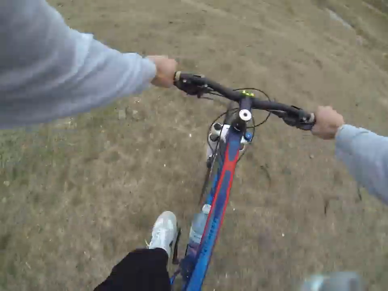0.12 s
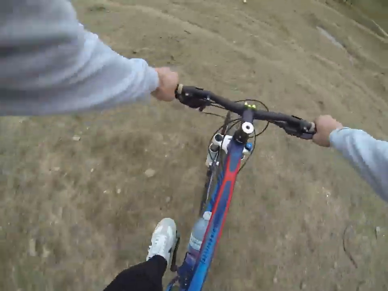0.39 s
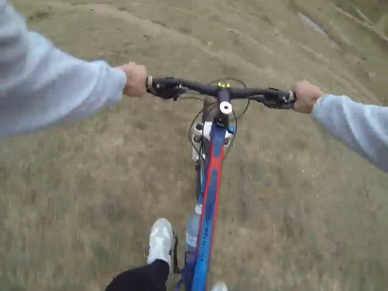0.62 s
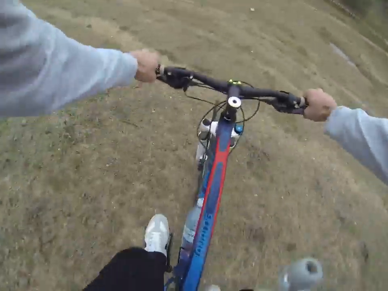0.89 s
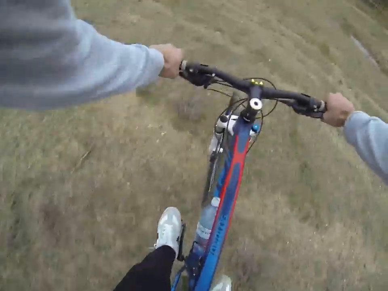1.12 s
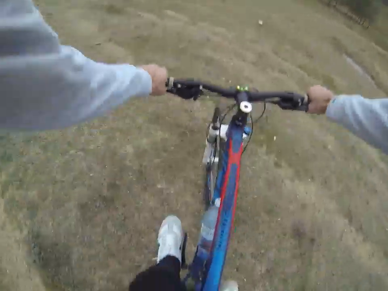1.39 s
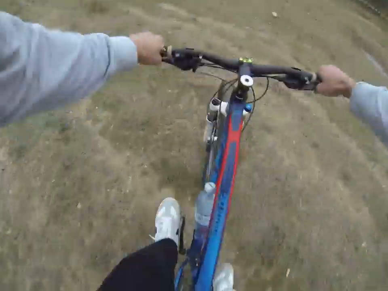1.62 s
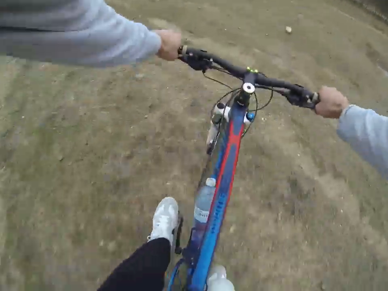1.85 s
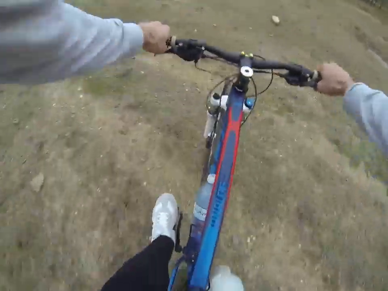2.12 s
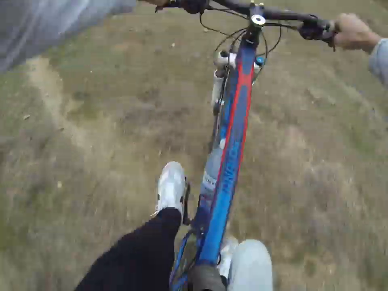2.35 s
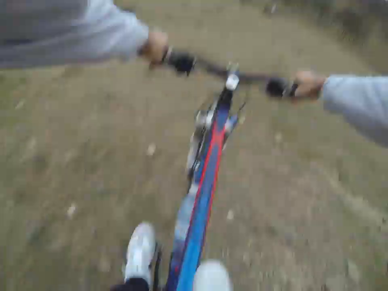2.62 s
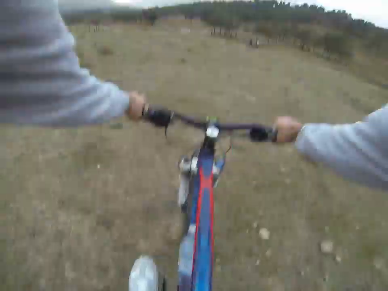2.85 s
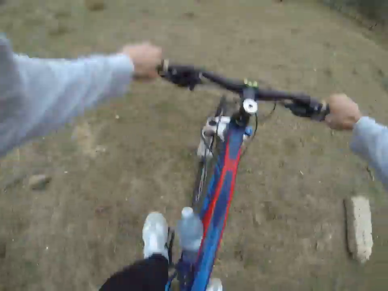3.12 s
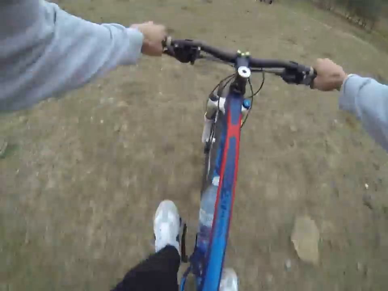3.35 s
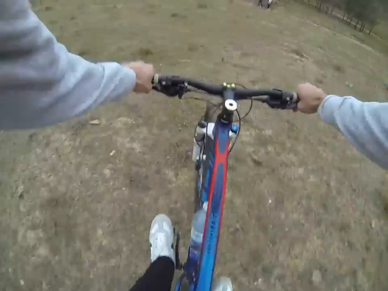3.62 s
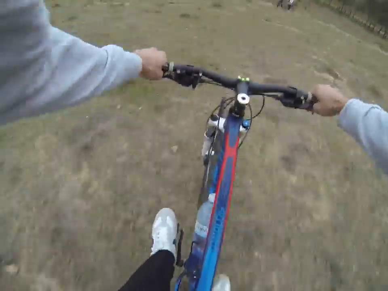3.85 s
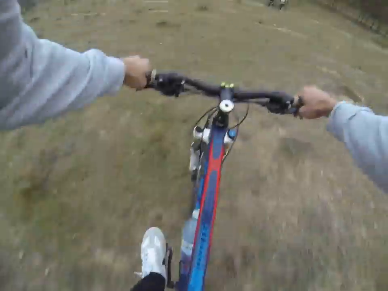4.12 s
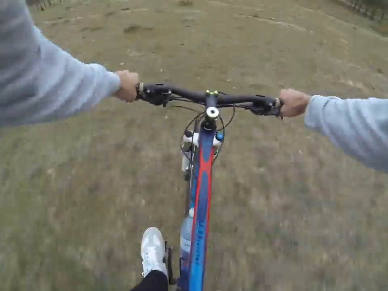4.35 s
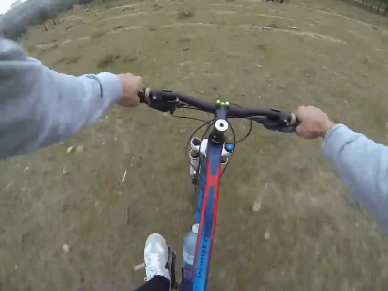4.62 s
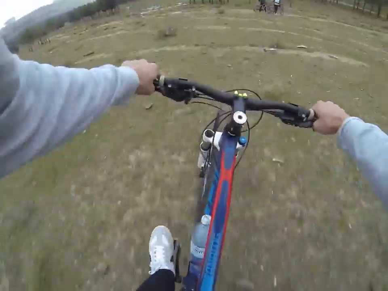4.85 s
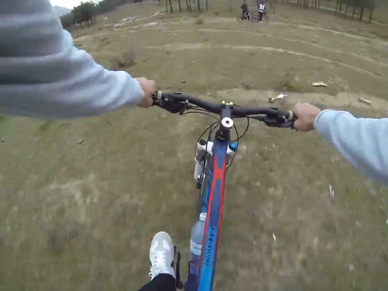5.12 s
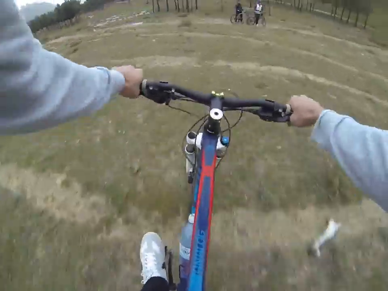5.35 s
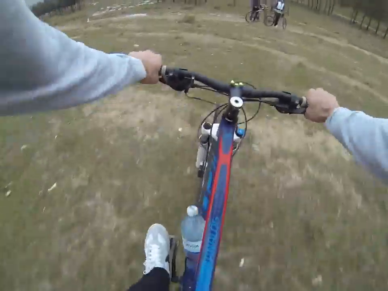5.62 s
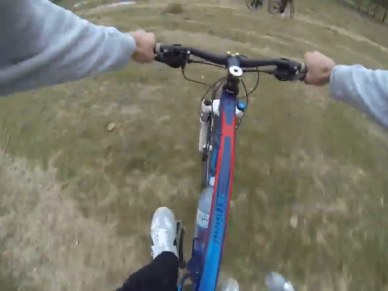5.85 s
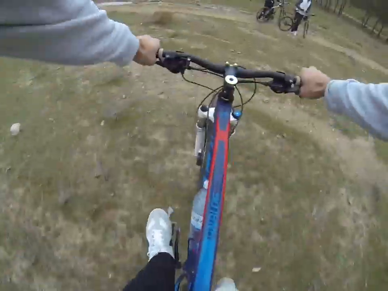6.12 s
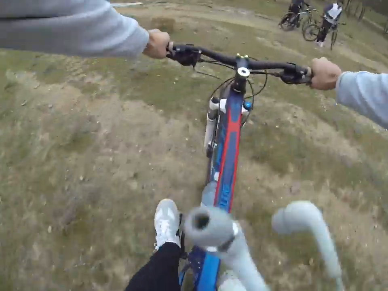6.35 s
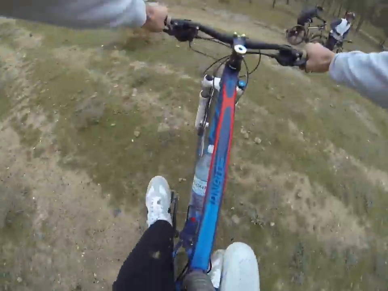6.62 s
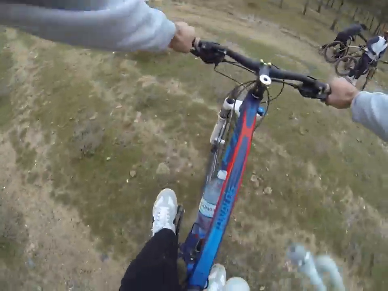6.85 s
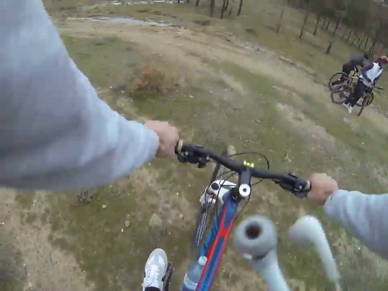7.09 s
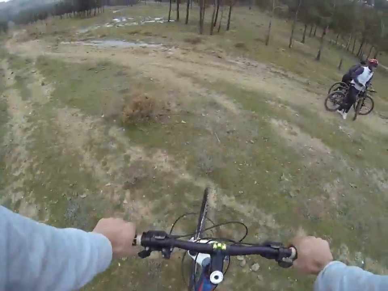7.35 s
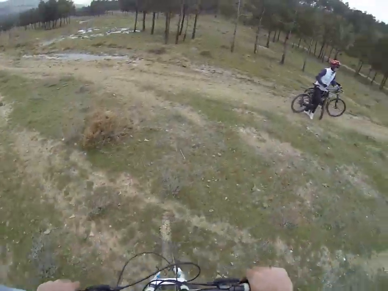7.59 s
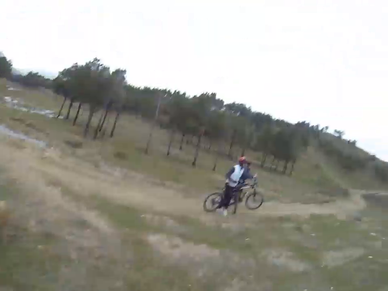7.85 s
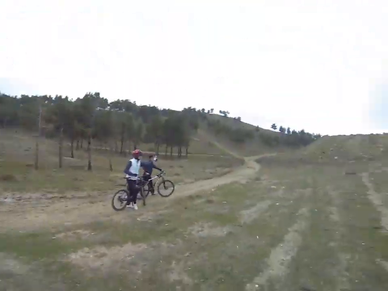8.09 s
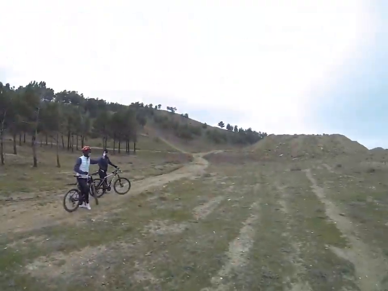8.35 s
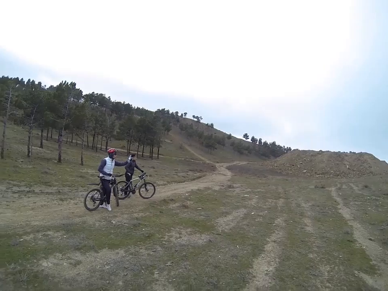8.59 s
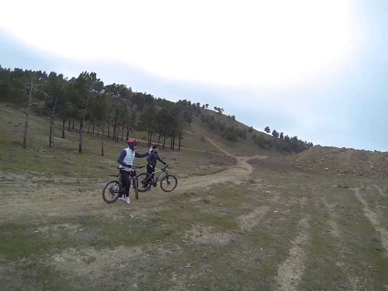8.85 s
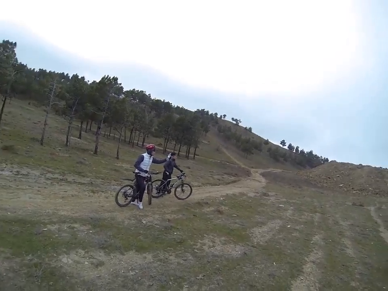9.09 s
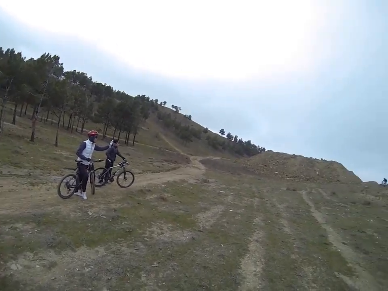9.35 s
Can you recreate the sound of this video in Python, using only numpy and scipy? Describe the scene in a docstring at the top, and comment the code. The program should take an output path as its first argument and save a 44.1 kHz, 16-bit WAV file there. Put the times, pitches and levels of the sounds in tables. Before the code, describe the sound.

Camera in a plastic case knocks and rattles on a helmet down a bumpy grass slope, with wind rumbling and small metal bike parts pinging.

```python
"""A camera in a hard plastic case rides on a cyclist's helmet down a bumpy grass slope.
From the start wind heaves the microphone and rumbles and hisses through the case, as filtered noise;
the electronics add a pulsed whine, a tone and its octave over faint hiss, that grows.
Soon the case scuffs in its mount, as grainy noise, and each jolt knocks the camera in its case,
as damped modes with noise bursts; then small metal parts of the bike ping, as bright damped modes."""
import sys
import numpy as np
from scipy import signal
from scipy.fft import rfft, irfft, next_fast_len
from scipy.io import wavfile
from scipy.ndimage import uniform_filter1d, map_coordinates

SR = 44100
rng = np.random.default_rng(int(sys.argv[2]) if len(sys.argv) > 2 else 0)


def voltage_ratio(level):
    """Linear amplitude factor for a level in decibels (scalar or array-like)."""
    return 10 ** (np.asarray(level, float) / 20)


def persist_wave(psi):
    """Save psi, clipped to +-1, as 16-bit WAV."""
    counts = np.round(np.clip(psi, -1, 1) * 32767).astype(np.int16)
    wavfile.write(sys.argv[1], SR, np.atleast_2d(counts).T)


N = 417627  # length in samples

# Jolts of the camera in its case. Each row: start in seconds, strength in dB,
# thud in dB and hardness in dB, both relative to the strength.
KNOCKS = [(0.206, -8, -32, -53), (0.282, -22, 2, -12.5), (0.331, -20.5, -18, -20), (0.379, -9.5, -6.5, -37),
          (0.42, -14.5, 2, -18), (0.456, 0.5, -14.5, -23), (0.53, -14, 11.5, -16), (0.578, -15, -15, -33),
          (0.591, 0, -2, -20), (0.676, -14.5, -3, -25.5), (0.837, -4.5, -11, -24),
          (1.014, -3.5, -16.5, -26), (1.119, 0, -18, -22), (1.149, -4.5, -1, -14.5),
          (1.246, -8.5, -8.5, -33), (1.39, -23.5, -18, -26), (1.45, -5, -7, -30), (1.467, -9.5, 6, -9),
          (1.543, -17, 11.5, -12.5), (1.555, -1.5, -11, -21), (1.637, -10.5, -10, -41.5),
          (1.693, -12.5, -6.5, -40), (1.799, -7, -21, -19.5), (1.86, -12, -4, -14.5), (1.929, -2, -25, -24),
          (1.957, -11, -23, -23), (2.065, -33, -21, 4.5), (2.081, 2.5, -19, -17.5), (2.163, -8, -32, -20.5),
          (2.177, -0.5, -15.5, -15), (2.196, -6, 1, -13.5), (2.269, -4, -23, -31), (2.321, -20, 7, -16),
          (2.454, -14.5, 0, -40), (2.509, -15, -11, -21), (2.524, -11.5, 9.5, -10), (2.554, -13, -13, -14),
          (2.625, 2, -21, -1.5), (2.728, -9.5, 3, -10.5), (2.786, -5.5, -1.5, -17),
          (2.824, -6.5, -3.5, -13), (2.877, -9, 1, -21), (2.905, -10.5, 1, -34), (2.965, -10, 4, -21.5),
          (2.988, -0.5, -2.5, -15), (3.068, -2, 3, -34.5), (3.377, -5.5, -4, -19), (3.485, -12, -4, -28),
          (3.494, -11.5, -4.5, -35), (3.729, -16, 12, -36), (3.806, -16, -5, -37), (3.885, -4, -3, -16),
          (4.603, -33, 8.5, -13), (5.146, -14.5, 11.5, -23), (5.322, -11, 19, -13.5), (5.379, -25, -11, 13),
          (5.491, -24, 14.5, 1), (5.69, -1.5, -10.5, -31), (5.749, -1, 5, -55), (5.771, -13, -23, -38),
          (5.825, -8, -3, -24), (5.851, -12, -1, -13.5), (5.926, -28, 24.5, -39), (5.941, -3.5, -25, -26),
          (6.023, -15, 11, -19), (6.061, -11, -37, -35), (6.16, -16.5, -9.5, -47), (6.253, -21, -32, -33),
          (6.382, -25, 19.5, -13), (6.405, -15, -11, -19.5), (6.509, -9, -15, -32.5),
          (6.539, -15.5, 10, -24), (7.002, -22.5, 8.5, -27), (7.142, -23.5, -3, -6),
          (7.745, -10, -0.5, -34), (7.805, 1.5, -5, -22), (7.901, -7.5, 8.5, -20.5),
          (7.976, -6.5, -13, -35), (8.036, -20.5, 11, -18), (8.412, -22.5, -19, -16.5),
          (8.529, -3, -11, -28), (8.91, -21.5, 5.5, -20), (9.117, -21.5, 8.5, -23)]
# Hiss as the case colours it. Each row: frequency in Hz, relative density in dB per Hz.
HISS = [(250, -43.5), (350, -13), (560, -11.5), (900, -14.5), (1100, -10), (1350, 0), (1530, 2.5),
        (1700, -12), (2150, -11), (2450, -14.5), (2800, -11.5), (3300, -23.5), (4000, -45.5), (4400, -58.5),
        (6000, -120)]
# Thin treble fizz. Each row: frequency in Hz, relative density in dB per Hz.
FIZZ = [(3000, -120), (3500, -18.5), (4000, -5), (4350, -16.5), (5150, -0.5), (5700, -15), (6500, -12),
        (7000, -19.5), (7700, -14.5), (8500, -20), (11000, -23.5), (16000, -42.5)]


def unit(x):
    """Scaled to rms 1."""
    return x / np.sqrt(np.mean(x ** 2) + 1e-20)


def curves(rows):
    """One value per sample for each column after the time."""
    s, *cols = np.transpose(rows)
    return [np.interp(np.arange(N) / SR, s, c) for c in cols]


def wobble(rate):
    """A smooth random curve, rate knots a second."""
    knots = rng.standard_normal(int(N * 200 / SR) + 4)
    return map_coordinates(knots, [np.arange(N) * rate / SR])


def coloured(x, spectrum):
    """x through a (Hz, dB) spectrum, interpolated along log frequency."""
    m = next_fast_len(N + 8192)
    hz, db = np.transpose(spectrum)
    log_hz = np.log(np.fft.rfftfreq(m, 1 / SR) + 1)
    gain = voltage_ratio(np.interp(log_hz, np.log(hz + 1), db))
    return irfft(rfft(x[:N], m) * gain, m)[:N]


def ringing(modes, t, scatter_db, detune):
    """Damped modes, each at a new strength and slightly new pitch for this blow."""
    total = np.zeros(len(t))
    for hz, db, t60 in modes:
        chance = rng.standard_normal(2)
        decay = voltage_ratio(db + scatter_db * chance[0] - 60 * t / t60)
        total += decay * np.sin(2 * np.pi * hz * (1 + detune * chance[1]) * t)
    return total


def add(track, s, sound):
    """Lays sound into track at s seconds."""
    start = max(round(s * SR), 0)
    track[start:start + len(sound)] += sound


def wind():
    """Slow pressure heaves, a lumpy rumble, and hiss and fizz that come in gritty puffs."""
    # Wind at the helmet. Each row: time in seconds, buffeting in dB, airflow in dB.
    wind_levels = [(0.0, -16.5, -49), (0.37, -10.5, -49.5), (0.84, -19.5, -55.5), (1.21, -11.5, -49),
                   (3.43, -18, -49.5), (3.85, -7.5, -43), (3.98, -20, -47), (4.3, -11, -51),
                   (4.59, -9, -44), (5.04, -9.5, -51.5), (5.3, -8.5, -37.5), (6.22, -20.5, -61.5),
                   (6.36, -40, -48), (6.44, -7, -44), (6.62, -23, -49), (7.09, -20.5, -44),
                   (7.49, -19.5, -45), (7.62, -6, -44), (8.36, -28.5, -49.5), (8.52, -14, -49.5),
                   (8.97, -20.5, -48.5), (9.07, -38.5, -52), (9.15, -5.5, -42), (9.47, -34.5, -62.5)]
    # Pressure on the microphone. Each row: frequency in Hz, relative density in dB per Hz.
    heave_spectrum = [(1.8, -41), (3.0, 5), (22, 8), (31, -6), (70, -31), (91, -58), (150, -120)]
    # Low roar through the case. Each row: frequency in Hz, relative density in dB per Hz.
    rumble_spectrum = [(25, -29), (45, -4.5), (90, -7), (200, -10), (320, -28.5), (500, -40.5), (900, -120)]

    heave_db, flow_db = curves(wind_levels)
    buffet, flow = heave_db - heave_db.mean(), flow_db - flow_db.mean()
    # mean level in dB, then dB per dB of each control
    rumble_db = -29.5 + 0.33 * buffet + 0.36 * flow
    fizz_db = -65.5 + 0.4 * flow
    gust, flutter, surge = wobble(17), wobble(45), wobble(8.1)

    heave = unit(voltage_ratio(1.5 * surge) * coloured(rng.standard_normal(N), heave_spectrum))
    heave = unit(heave - 0.15 * (heave ** 2 - 1))  # suction dips are sharper than the rounded pushes
    lumps = voltage_ratio(3.33 * gust + 3.07 * wobble(30) + 3.0 * surge)
    rumble = unit(lumps * coloured(rng.standard_normal(N), rumble_spectrum))

    # noise whose level varies in patches of time and frequency
    z = signal.stft(rng.standard_normal(N), nperseg=512)[2]
    field = uniform_filter1d(uniform_filter1d(rng.standard_normal(z.shape), 6, 0), 8, 1)
    patchy = unit(signal.istft(z * voltage_ratio(2.2 * unit(field)), nperseg=512)[1][:N])
    # sparse grit: tiny contacts of camera on case
    sparse = rng.random(N) < 0.004
    grit = unit(rng.standard_normal(N) * sparse * voltage_ratio(15 * rng.random(N)))
    hiss_puffs = voltage_ratio(1.4 * gust + 3.2 * flutter + 0.6 * surge)
    hiss = unit(hiss_puffs * coloured(patchy + 0.6 * grit, HISS))
    fizz_puffs = voltage_ratio(2.2 * gust + 3 * flutter)
    fizz = unit(fizz_puffs * coloured(patchy + 0.81 * grit, FIZZ))

    low = voltage_ratio(heave_db) * heave + voltage_ratio(rumble_db) * rumble
    return low + voltage_ratio(flow_db + 3.5) * hiss + voltage_ratio(fizz_db) * fizz


def whine():
    """Electronics: a thin unsteady tone and its octave in regular pulses, slowly growing, over a faint hiss."""
    # Where the whine falls away. Each row: start in seconds, length in seconds.
    dropouts = [(0.78, 0.084), (1.2, 0.11), (1.4, 0.3), (2.15, 1.4), (5.733, 0.51)]
    # Faint steady hiss. Each row: frequency in Hz, relative density in dB per Hz.
    floor_spectrum = [(2000, -5), (8000, -3.5), (13000, -6.5), (16000, -28.5)]
    whine_hz, pulse_hz = 6443, 48
    start_db, growth_db_per_s, dropout_db, floor_db = -82, 1.13, -13, -86

    t = np.arange(N) / SR
    gate = (0.5 + 0.5 * np.cos(2 * np.pi * pulse_hz * t + 1.5)) ** 2.5
    phase = 2 * np.pi * whine_hz * t + 0.9 * wobble(40)
    tone = np.sin(2 * phase) + voltage_ratio(-1.5) * np.sin(phase)
    away = sum(1.0 * (t > s) * (t < s + length) for s, length in dropouts)
    away = uniform_filter1d(away, size=900)  # soft edges
    level_db = start_db + growth_db_per_s * t + dropout_db * away
    floor = unit(coloured(rng.standard_normal(N), floor_spectrum))
    return voltage_ratio(level_db) * unit(gate * tone) + voltage_ratio(floor_db) * floor


def scuffs():
    """The case scuffs in its mount: short crunchy rubs through the same case resonances as the hiss."""
    # Rubs of the case. Each row: start in seconds, length in seconds, level in dB.
    rubs = [(0.166, 0.028, -40), (0.423, 0.1, -38.5), (0.895, 0.05, -38.5), (1.335, 0.063, -39.5),
            (2.441, 0.05, -35.5), (2.727, 0.026, -27), (3.527, 0.14, -56), (3.833, 0.083, -41),
            (4.403, 0.1, -39.5), (4.625, 0.11, -44.5), (5.039, 0.11, -35), (6.39, 0.07, -35.5),
            (7.137, 0.18, -42.5), (7.452, 0.11, -34), (7.743, 0.1, -31), (8.39, 0.15, -41),
            (9.125, 0.1, -43)]
    edge_s, fizz_db = 0.014, -25

    t = np.arange(N) / SR
    level = np.zeros(N)
    for s, length, db in rubs:
        rise, fall = np.tanh((t - s) / edge_s), np.tanh((t - s - length) / edge_s)
        level += voltage_ratio(db) * (rise - fall) / 2
    crunch = (rng.random(N) < 0.02) * voltage_ratio(12 * rng.random(N))
    grains = rng.standard_normal(N) * (0.3 + crunch) * voltage_ratio(3.9 * wobble(70))
    return level * (unit(coloured(grains, HISS)) + voltage_ratio(fizz_db) * unit(coloured(grains, FIZZ)))


def rattle():
    """Light random contacts as knock rows, stronger near the jolts."""
    per_s, base_db, spread_db, reach_s = 22, -37.5, 5, 0.05
    place, size, thud, hard = rng.random((int(per_s * N / SR), 4)).T
    s = place * N / SR
    jolt_s, jolt_db = np.array(KNOCKS)[:, :2].T
    nearness = np.exp(-((s[:, None] - jolt_s) / reach_s) ** 2)
    shake = (voltage_ratio(jolt_db) * nearness).sum(axis=1)
    db = base_db + 8 * np.log10(shake + 0.017) - spread_db * np.log(size + 0.025)
    rows = np.transpose([s, db, 16 * thud - 9, 18 * hard - 26])
    return [tuple(row) for row in rows]


def knocks():
    """A blow rings three groups of case modes, a quick rebound repeats two; a crack, snap and scrape join."""
    # Deep modes of the case. Each row: frequency in Hz, relative level in dB, 60 dB decay in seconds.
    thud_modes = [(159, 2.5, 0.05), (197.7, 3.5, 0.024), (363.5, -13, 0.051)]
    # Hollow modes. Each row: frequency in Hz, relative level in dB, 60 dB decay in seconds.
    hollow_modes = [(550, 3.5, 0.0046), (697, 2, 0.0035), (816, -4.5, 0.026), (952, -2, 0.044)]
    # Main ring of the case. Each row: frequency in Hz, relative level in dB, 60 dB decay in seconds.
    ring_modes = [(1304, -9.5, 0.026), (1526, -1, 0.02), (1969, -5, 0.0094)]
    # Crack of the case. Each row: frequency in Hz, relative density in dB per Hz.
    crack_spectrum = [(1800, -24.5), (2300, 3.5), (2750, 8.5), (3200, -9), (3700, -11), (4250, -23.5),
                      (5150, -6.5), (5900, -32.5), (6800, -34), (7600, -24), (8400, -43.5), (9500, -35),
                      (10500, -47), (16000, -52)]
    # Broad snap of the hardest blows. Each row: frequency in Hz, relative density in dB per Hz.
    snap_spectrum = [(300, -28), (650, 0), (900, 2), (1700, -5.5), (2500, -12), (3800, -10), (5500, -11.5),
                     (7500, -27), (9800, -20), (12000, -37), (16000, -50)]

    track, cracks, snaps, scrapes = np.zeros((4, N + SR))
    t = np.arange(SR // 16) / SR
    soft = 1 - np.exp(-(t / 0.00053) ** 2)  # plastic on plastic: no sharp edge
    swell = 1 - np.exp(-(t / 0.0024) ** 3.0)  # the main ring builds up over a few cycles
    for s, db, thud_db, hard_db in KNOCKS + rattle():
        # weak, deep jolts sound more hollow
        hollow_db = -20 - 0.28 * db + 0.32 * thud_db + 2.5 * rng.standard_normal()
        # the hardest blows snap and ring the hollow group
        clack = voltage_ratio(-4.5 + 1.7 * (db + hard_db))
        hollow = voltage_ratio(hollow_db) + 0.73 * clack

        thud_onset = 1 - np.exp(-t / 0.001)
        blow = voltage_ratio(thud_db - 4) * thud_onset * ringing(thud_modes, t, scatter_db=2, detune=0.06)
        blow += hollow * voltage_ratio(4) * soft * ringing(hollow_modes, t, scatter_db=3, detune=0.04)
        lag = round(SR * (0.001482 + 0.0028 * rng.random()))
        blow[lag:] += 0.36 * blow[:-lag]  # the rebound repeats the thud and hollow modes
        blow += voltage_ratio(7.0) * swell * ringing(ring_modes, t, scatter_db=3.0, detune=0.021)
        add(track, s - 0.0008, voltage_ratio(db - 2.0) * blow)

        noise = rng.standard_normal((2, len(t)))
        # the hardest blows are the brightest
        edge = noise[0] + voltage_ratio(db + hard_db + 6.0) * np.gradient(noise[0])
        crack = voltage_ratio(db + min(hard_db, -11) + 12.5) * soft * edge * voltage_ratio(-60 * t / 0.013)
        add(cracks, s - 0.0006, crack)
        add(snaps, s - 0.0006, voltage_ratio(db + 16.5) * clack * soft * noise[1] * voltage_ratio(-60 * t / 0.012))
        add(scrapes, s, voltage_ratio(db - 4) * noise[1] * voltage_ratio(-60 * t / 0.041))
    bursts = coloured(cracks, crack_spectrum) + coloured(snaps, snap_spectrum)
    return track[:N] + bursts + coloured(scrapes, HISS)


def pings():
    """Small metal parts of the bike strike: a bright ring and a gritty tick."""
    # Strikes. Each row: start in seconds, strength in dB, tick in dB relative to the strength.
    strikes = [(0.2482, -40.5, -11), (1.3676, -50.5, 2), (2.3233, -50.5, 0), (2.4424, -43.5, -4),
               (3.1488, -46, -2), (3.5714, -47.5, -12), (3.7928, -42, -5), (3.9733, -37.5, -21),
               (4.2074, -43, -17), (4.3587, -50.5, -7), (4.438, -45.5, -16), (4.578, -53, -22),
               (4.6173, -29, -18.5), (4.6917, -48, -3), (4.7874, -58, 6), (5.1986, -35, -15),
               (5.377, -23.5, -33), (5.4185, -52, 7), (5.463, -35, -3.5), (5.478, -28.5, -31),
               (5.5521, -53, 2.5), (5.655, -53.5, 11), (6.442, -61.5, 12.5)]
    # Modes of the metal. Each row: frequency in Hz, relative level in dB,
    # 60 dB decay in seconds for a strong strike.
    metal_modes = [(6700, -11, 0.054), (7100, -3.5, 0.034), (7960, -8, 0.083), (9750, -20, .05),
                   (11300, -24.5, 0.027)]

    track, ticks = np.zeros((2, N + SR))
    t = np.arange(SR // 6) / SR
    for s, db, tick_db in strikes:
        noise = rng.standard_normal((2, len(t)))
        damping = voltage_ratio(25 * min(db + 30.5, 0) * t)  # light strikes die sooner
        onset = 1 - np.exp(-t / 0.00064)
        ring = damping * onset * ringing(metal_modes, t, scatter_db=3.0, detune=0.0024)
        contact = voltage_ratio(-12) * np.gradient(noise[0]) * voltage_ratio(-60 * t / 0.02)
        add(track, s, voltage_ratio(db + 0.5) * (ring + contact))
        add(ticks, s, voltage_ratio(db + tick_db + 17.5) * noise[1] * voltage_ratio(-60 * t / 0.07))
    return track[:N] + coloured(ticks, FIZZ)


def scene():
    """All sources reach one microphone inside the case."""
    return (wind() + whine() + scuffs() + knocks() + pings())[None]


def gain_control(x, over_db, share, release_db):
    """A share of the sharp peaks' held excess comes off the gain; the excess falls release_db a second."""
    sharp = np.abs(x - uniform_filter1d(x, size=400))  # slow heaves pass unnoticed
    ramp = release_db * np.arange(N) / SR
    excess = np.maximum(20 * np.log10(sharp + 1e-9) - over_db, 0)
    held = np.maximum.accumulate(excess + ramp, axis=-1) - ramp
    late = uniform_filter1d(held, size=301, origin=150)  # the circuit needs a few ms to react
    return x * voltage_ratio(-share * late)


def low_pass(x):
    """Removes everything above the highest recorded frequency."""
    return signal.sosfilt(signal.butter(12, 15850, fs=SR, output="sos"), x)


def record(dry):
    """Gain control, then an input stage that rounds off the largest swings."""
    level = gain_control(dry, over_db=-15, share=0.14, release_db=58.5)
    rounded = level / (1 + np.abs(level / 0.94) ** 5) ** (1 / 5)
    return low_pass(rounded)


dry = scene()
out = record(dry)
persist_wave(out)
```